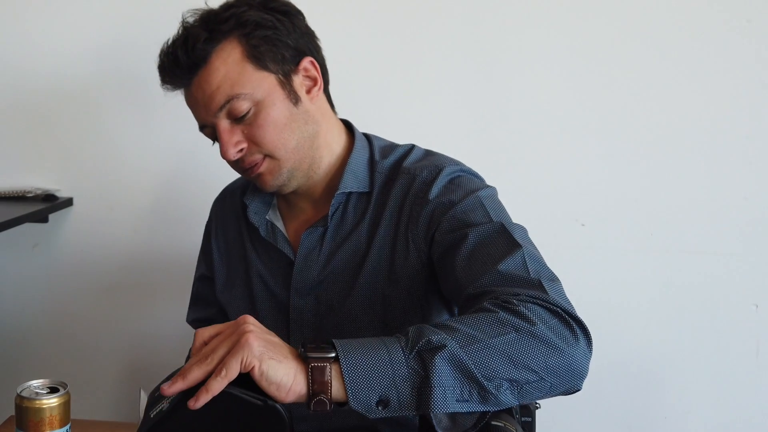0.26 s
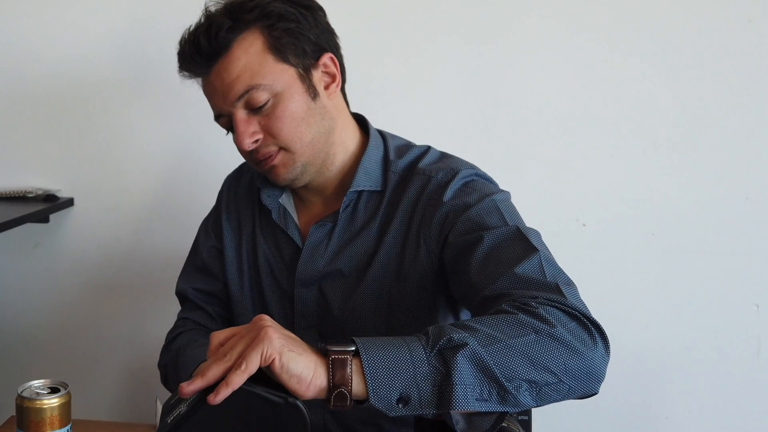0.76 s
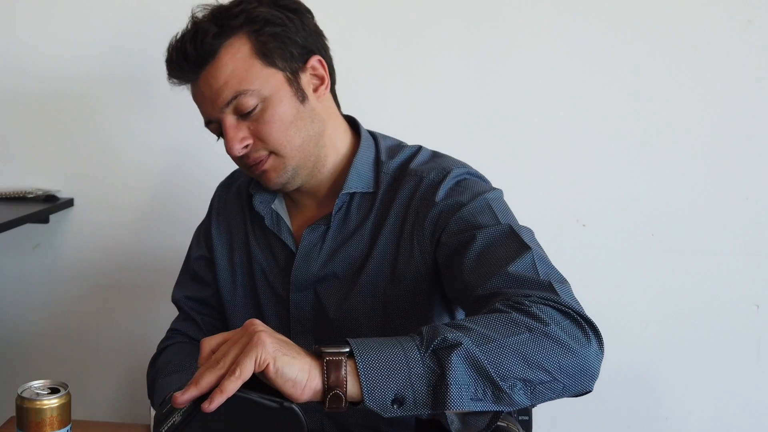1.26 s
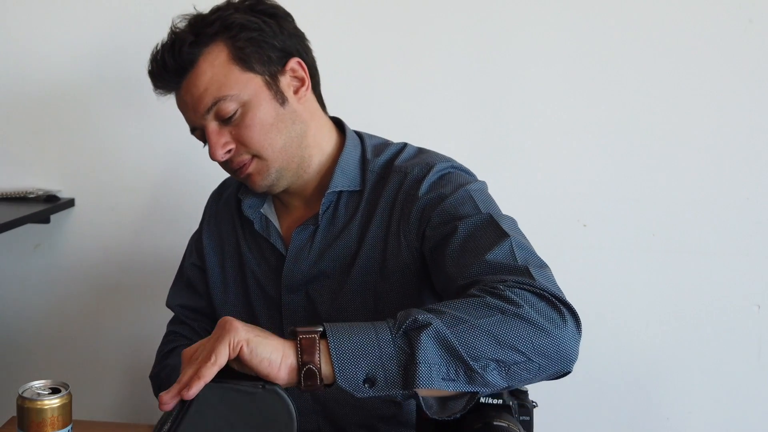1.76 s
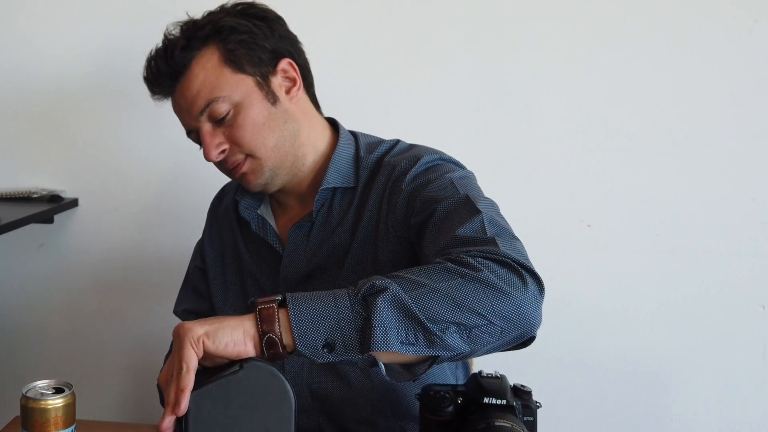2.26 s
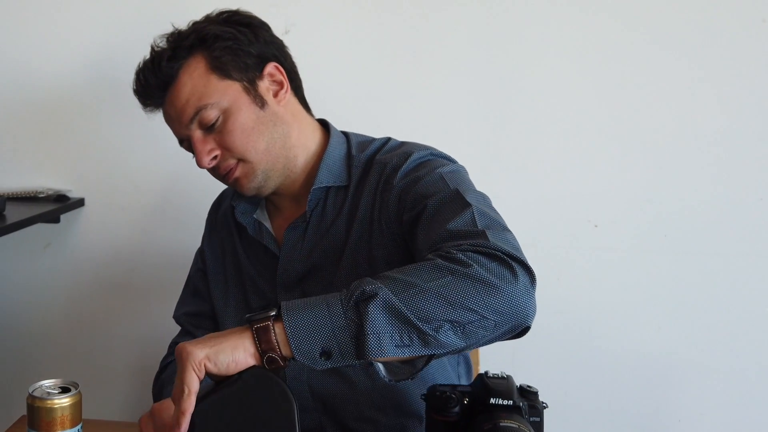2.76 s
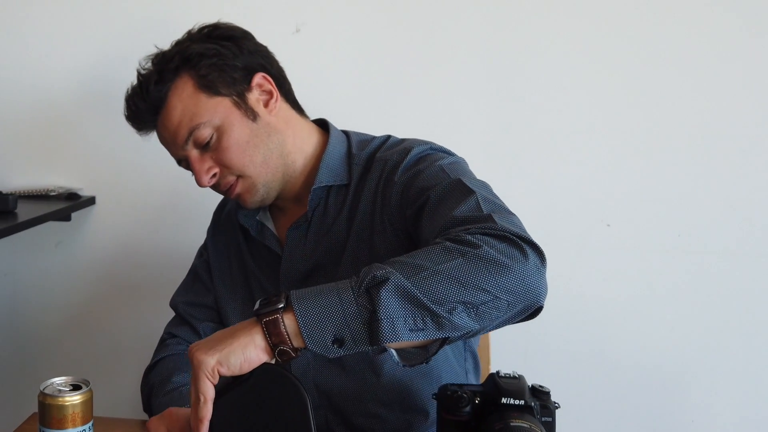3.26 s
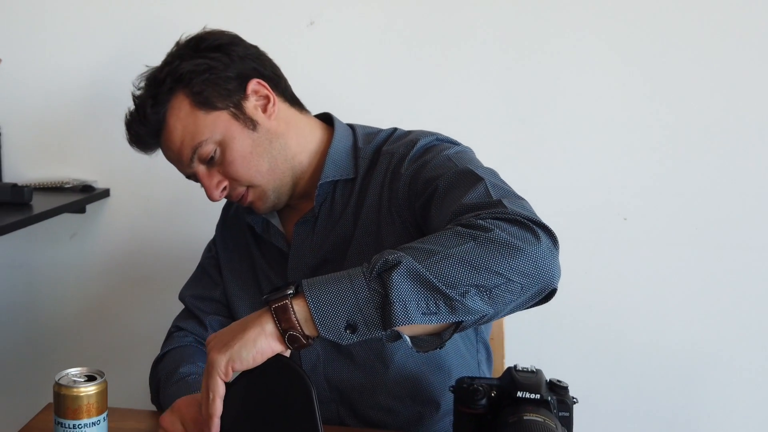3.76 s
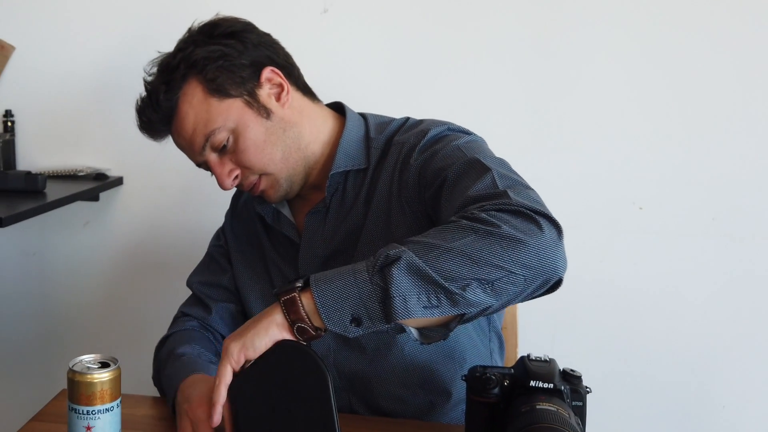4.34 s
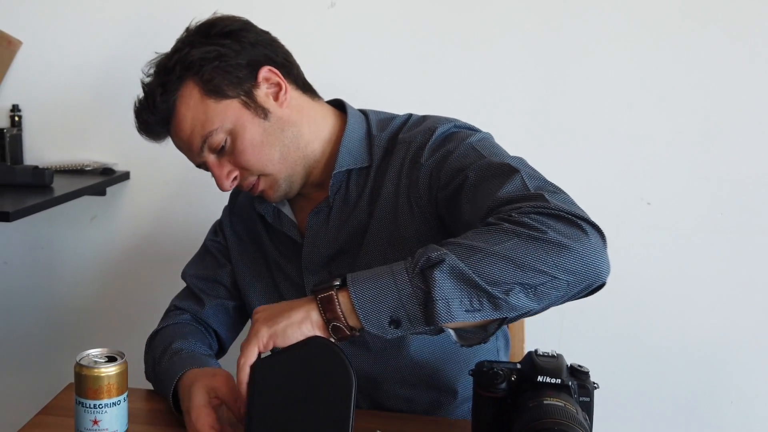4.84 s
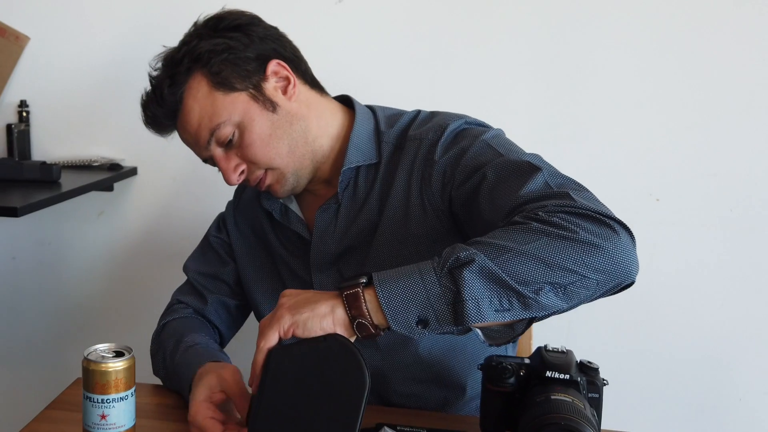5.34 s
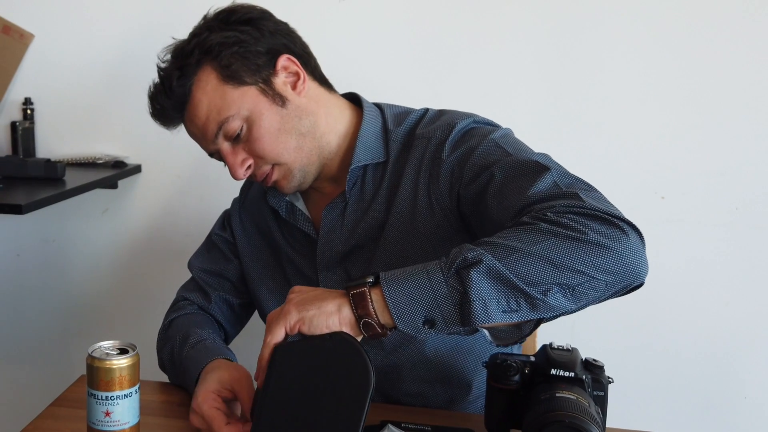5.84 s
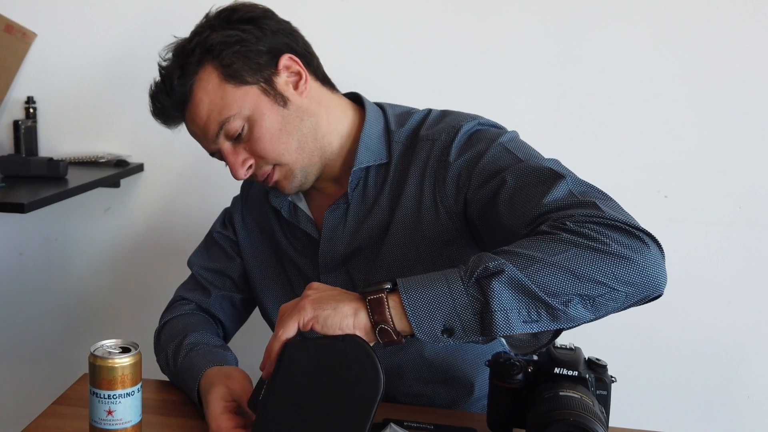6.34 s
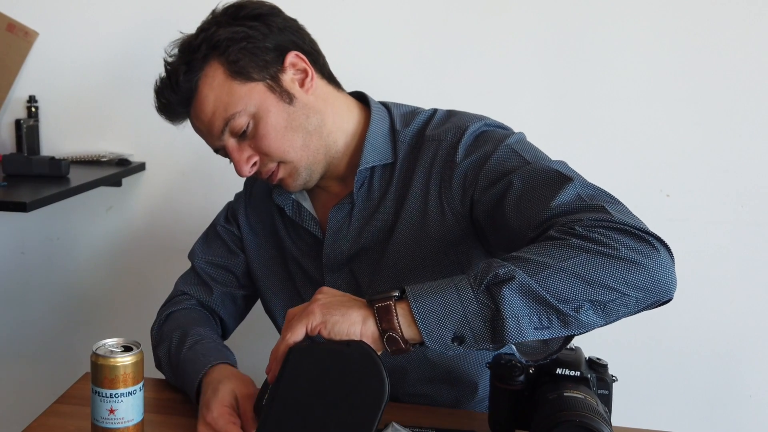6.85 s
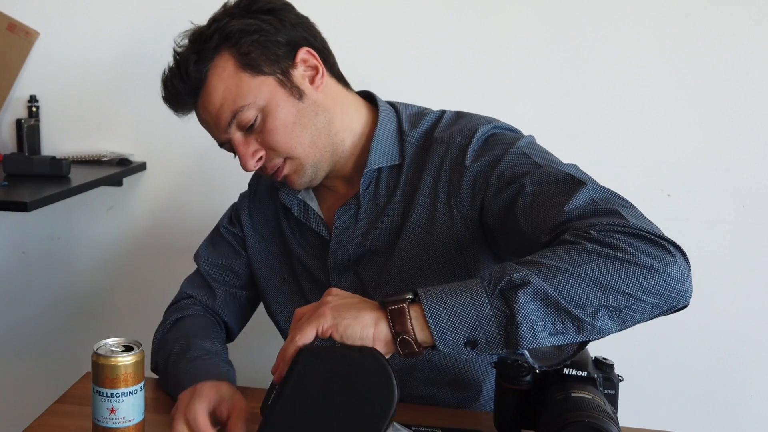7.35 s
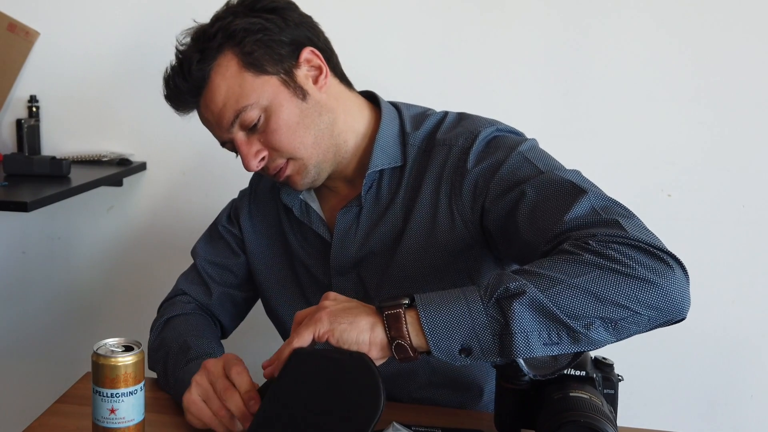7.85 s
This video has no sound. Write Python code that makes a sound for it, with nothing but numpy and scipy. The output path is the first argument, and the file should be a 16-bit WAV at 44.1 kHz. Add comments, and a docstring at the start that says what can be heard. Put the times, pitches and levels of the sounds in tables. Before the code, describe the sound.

Close indoor handling of a padded case on a wooden table: low scraping, a first cluster of knocks, then a louder rattling burst as it is tipped up. It falls nearly silent, with tiny hook ticks. A brief rasping crackle comes midway, scattered snaps follow, and finally a quick tearing of hook-and-loop and soft hollow thuds. Centred, close sound over a steady faint hush.

```python
"""In a small bare room a padded case is dragged, tipped up and knocked on a wooden table.
Fingers work its hook-and-loop strip: single hooks snap as short noise bursts, patches rip as dense slips.
Rubbing and knocks ring the modes of case and table; the table also rumbles and hums after jolts.
Direct sound sits in the middle; the echoes and the hush differ between left and right, mostly in the treble."""
import sys
import numpy as np
from scipy import signal
from scipy.fft import rfft, irfft, next_fast_len
from scipy.io import wavfile

SR = 44100
rng = np.random.default_rng(int(sys.argv[2]) if len(sys.argv) > 2 else 0)


def pcm_store(signal):
    """Save signal as 16-bit PCM."""
    levels = np.round(np.clip(np.atleast_2d(signal), -1, 1) * 32767)
    wavfile.write(sys.argv[1], SR, levels.astype(np.int16).T)


N = 357342

# Modes of case and table. Each row: pitch in Hz, level in dB, nominal ring time t60 in seconds.
CASE_MODES = [(144, -8, 0.024), (176.5, -3.5, 0.09), (225, 2, 0.09), (260, 1, 0.026), (388, -1.5, 0.1),
              (440, 5, 0.025), (515.7, -0.5, 0.039), (592.3, 1, 0.025), (693, -2.5, 0.075), (858, 0, 0.011),
              (955, 1.5, 0.033), (1053, 1.5, 0.014), (1233, -0.5, 0.017), (1464, 1.5, 0.035),
              (1656, 1.5, 0.017), (1898, 3, 0.04), (2150, -6.5, 0.023), (2606, -4.5, 0.028),
              (2950, -6.5, 0.029), (3350, -10, 0.025)]
LOW = [row for row in CASE_MODES if row[0] < 650]
HIGH = [row for row in CASE_MODES if row[0] >= 650]
# Modes of the stiff hook strip. Each row: pitch in Hz, level in dB, nominal ring time t60 in seconds.
STRIP_MODES = [(3930, -2, .02), (4730, -7.5, 0.0027), (5210, -5.5, .01), (6440, -4, 0.0066),
               (7110, 1.5, .01), (7850, -6.5, 0.006), (8650, -3.5, 0.027), (9700, -4.5, .008),
               (10700, -5, 0.0053)]
STRIP_FLAT = 0.94  # share of a tear that is heard between those modes
# Pushes of the case over the table. Each row: peak in seconds, rise in seconds, fall in seconds,
# hollow body in dB, scrape in dB, cloth in dB, loudest panel in Hz, loudest body mode in Hz.
PUSHES = [(0.029, 0.16, .2, -54, -56, -66, 928, 430), (0.16, 0.035, .2, -44.5, -51.5, -59.5, 1062, 450),
          (0.375, 0.025, .35, -42.5, -41, -89, 1045, 530), (0.53, 0.04, 0.091, -52, -36, -47.5, 1250, 540),
          (0.611, 0.11, 0.16, -39, -34.5, -45, 1513, 500),
          (0.679, 0.074, 0.071, -37.5, -41.5, -58, 1096, 380), (0.84, 0.1, 0.11, -53, -34, -48, 1624, 520),
          (0.9, 0.079, 0.06, -49.5, -35.5, -63, 990, 480), (1.1, .04, .15, -56.5, -42, -88, 979, 600),
          (1.279, 0.11, 0.12, -32.5, -30, -44.5, 980, 400),
          (1.569, 0.075, 0.052, -47.5, -61, -83, 891, 340), (1.792, .05, .12, -42, -46, -64, 760, 510),
          (1.919, 0.068, 0.26, -62.5, -43, -55.5, 1126, 450), (2.0, .08, 0.092, -58, -41.5, -53, 1000, 530),
          (2.079, .07, 0.32, -34.5, -30, -45, 1350, 396), (2.21, 0.12, 0.2, -31.5, -32.5, -45.5, 1193, 440),
          (2.36, 0.037, 0.19, -30.5, -31.5, -32.5, 1346, 400),
          (2.474, 0.014, 0.026, -45.5, -37.5, -43.5, 2603, 500),
          (2.53, 0.23, 0.16, -39.5, -36, -58.5, 888, 400), (3.11, .04, .1, -66.5, -64.5, -70, 908, 373),
          (3.165, .04, .06, -62.5, -73.5, -71, 900, 390),
          (3.28, .025, 0.069, -65.5, -66.5, -70.5, 894, 420), (3.528, .05, .1, -64, -74.5, -82.5, 722, 500),
          (5.1, 0.15, 0.089, -65, -72.5, -70.5, 962, 270),
          (5.332, 0.057, 0.18, -51.5, -68.5, -61, 1519, 225),
          (5.551, .12, 0.16, -73.5, -70.5, -72, 1092, 260),
          (5.937, 0.076, 0.11, -55, -60.5, -63.5, 1098, 380),
          (6.451, 0.16, 0.24, -62.5, -65.5, -74.5, 913, 330),
          (6.742, 0.028, 0.065, -52, -61.5, -80, 808, 350), (6.792, .04, .2, -42, -46.5, -62, 1083, 460),
          (6.89, 0.12, .09, -44, -56.5, -61, 876, 460), (7.04, 0.023, 0.083, -51, -71, -83, 801.5, 240),
          (7.08, .03, .14, -46.5, -61.5, -74, 746.5, 480), (7.21, .06, 0.053, -44.5, -52, -71, 1497, 385),
          (7.268, 0.063, 0.082, -39, -61, -53, 1012, 420),
          (7.37, 0.043, 0.076, -38, -36.5, -51, 804.5, 300),
          (7.44, .05, 0.088, -43.5, -45, -55.5, 784, 580), (7.55, .1, 0.17, -47.5, -59, -59.5, 783, 390),
          (7.72, .1, 0.099, -50, -73, -76.5, 791, 254.3), (7.985, 0.065, 0.14, -50, -52.5, -72, 1057, 476),
          (8.1, .1, 0.093, -47.5, -51, -65, 1113, 507)]
# Hands resting on the case and shifting a little.
# Each row: time in seconds, case in dB, cloth in dB, table in dB.
RESTING_HANDS = [(0, -52, -86, -65.5), (1, -63.5, -76, -70.5), (1.7, -63.5, -70, -70),
                 (2.75, -65, -76, -64.5), (3.3, -67, -81, -68.5), (3.85, -69, -75.5, -74),
                 (4.25, -80, -90, -75.5), (4.9, -73.5, -86, -73), (5.6, -69, -76.5, -72.5),
                 (5.8, -80, -100, -74.5), (6.25, -79.5, -80.5, -73), (7, -72.5, -73, -72.5),
                 (8.1, -68.5, -79, -78)]


def amp(db):
    """Decibels to gain."""
    return 10 ** (np.asarray(db) / 20)


def unit(x):
    """Scaled to rms 1."""
    return x / np.sqrt(np.mean(x ** 2) + 1e-20)


def along(points, hz):
    """Reads a curve of (Hz, value) points on a log frequency axis."""
    f, v = np.transpose(points)
    return np.interp(np.log(hz + 1), np.log(f + 1), v)


def curves(rows):
    """One value per sample for each column after the time."""
    s, *cols = np.transpose(rows)
    return [np.interp(np.arange(N) / SR, s, c) for c in cols]


def filtered(x, response):
    """x shaped by a complex response of frequency."""
    m = next_fast_len(N + SR // 2)
    return irfft(rfft(x, m) * response(np.fft.rfftfreq(m, 1 / SR)), m)[..., :N]


def coloured(x, spectrum):
    """x with the given spectrum, at rms 1."""
    return unit(filtered(x, lambda hz: amp(along(spectrum, hz))))


def band(centre_hz, width_hz, order):
    """A resonance applied order times, so that its skirts fall steeply."""
    return lambda f: (1j * f * width_hz / (centre_hz ** 2 - f * f + 1j * f * width_hz)) ** order


def modes(rows, spread):
    """Resonances, one per row; damping widens them by the factor spread."""
    def responses(f):
        return np.array([amp(db) * band(hz, spread * np.log(1000) / (np.pi * t60), order=2)(f)
                         for hz, db, t60 in rows])
    return responses


def freed(hz, centre_hz, octaves):
    """The grip of the hand damps the modes that lie far from centre_hz."""
    return np.exp(-(np.log2(hz / centre_hz) / octaves) ** 2)


def slips(rate, scatter_db, t60, smooth):
    """Stick-slip friction: short bursts of uneven size at random moments over a smooth rub."""
    chance, size = rng.random(N), rng.exponential(size=N)
    starts = (chance < rate / SR) * amp(scatter_db * np.minimum(size, 5))
    gate = signal.lfilter([1], [1, -amp(-60 / (t60 * SR))], starts)
    return (unit(gate) + smooth) * rng.standard_normal(N)


def swells(peak_s, rise_s, fall_s, db):
    """Power of each swell on a millisecond grid: 20 dB below its peak at rise_s before and fall_s after."""
    roundness = 1.314  # 1 = pointed swells, 2 = round ones
    late = np.arange(0, N / SR + .001, .001) - np.reshape(peak_s, (-1, 1))
    before, after = -late / np.reshape(rise_s, (-1, 1)), late / np.reshape(fall_s, (-1, 1))
    away = np.where(late < 0, before, after)
    return amp(2 * (np.reshape(db, (-1, 1)) - 20 * away ** roundness))


def fine(x):
    """From the millisecond grid to samples."""
    return np.interp(np.arange(N) / SR, np.arange(len(x)) / 1000, x)


def gain(power, rest_db):
    """Swells and resting level, added as powers and turned into a gain."""
    return np.sqrt(fine(power.sum(axis=0)) + amp(2 * rest_db))


def still_room():
    """The hush of the still room: steady coloured noise, drawn apart for sum and difference."""
    # Spectrum of the hush. Each row: frequency in Hz, relative level in dB per Hz.
    hush_spectrum = [(15, -19.5), (25, -21.5), (130, -8), (285, -3.5), (344, 2), (405, -18.5), (531, -15),
                     (775, -12), (5280, -17.5), (11600, -25), (16000, -34.5)]
    hush_db = -73.5
    return amp(hush_db) * coloured(rng.standard_normal((2, N)), hush_spectrum)


def room(x):
    """Diffuse echo tails for sum and difference, drawn anew twelve times a second as the sources move."""
    # Decay of the echoes. Each row: frequency in Hz, t60 in seconds.
    wall_decay = [(150, 0.44), (1000, 0.46), (4000, 0.14), (12000, 0.2)]
    hop = SR // 12
    wet = np.zeros((2, N + 2 * SR))
    for start in range(0, N, hop):
        hz, t, noise = signal.stft(rng.standard_normal((2, SR * 2 // 3)), SR, nperseg=256)
        gather = 1 - np.exp(-t / 0.00092)  # echoes need time to gather
        decay = amp(-60 * t / along(wall_decay, hz)[:, None]) * gather
        tail = signal.istft(noise * decay, SR, nperseg=256)[1]
        tail = tail / np.linalg.norm(tail[0])
        answer = signal.fftconvolve(x[None, start:start + hop], tail, axes=1)
        wet[:, start + 250:][:, :answer.shape[1]] += answer  # 250 samples after the direct sound
    return wet[:, :N]


def table():
    """Jolts make the frame rumble, ring the top, and leave a long hum in it."""
    # Jolts of the table. Each row: peak in seconds, frame rumble in dB, ring of the top in dB, fall in seconds.
    jolts = [(0.34, -70, -61, 0.086), (0.635, -52, -40.5, 0.14), (1.25, -43, -31, 0.073),
             (1.35, -70, -71, 0.29), (1.79, -73, -51.5, 0.19), (2.538, -70, -47.5, 0.11),
             (5.321, -59, -50.5, 0.081), (5.899, -62, -52.5, 0.15), (6.48, -73, -71, 0.17),
             (6.798, -68, -50.5, 0.12), (7.101, -73, -53.5, 0.12), (7.23, -50, -54, 0.21),
             (7.369, -49, -38.5, 0.16), (7.53, -61, -56, 0.77), (7.76, -69, -45.5, 0.055),
             (7.97, -70, -64, 0.14)]
    # Spectrum of the frame rumble. Each row: frequency in Hz, relative level in dB per Hz.
    frame_spectrum = [(15, -16.5), (25, -3.5), (45, -5), (70, -4.5), (100, -8), (160, -31), (300, -87)]
    jolt_rise_s = 0.011
    hum_hz, hum_t60_s, hum_db = 120.5, 1.3, -12.5  # hum level is over the jolt's ring
    rest_ring_db = -3  # over the table column of the resting hands
    s, rumble_db, ring_db, fall = np.transpose(jolts)
    rest_db = curves(RESTING_HANDS)[2]
    rumble = coloured(slips(rate=41, scatter_db=-2.5, t60=0.04, smooth=0.33), frame_spectrum)
    ring = unit(filtered(rng.standard_normal(N), modes(LOW[:1], spread=1.0))[0])
    late = np.maximum(np.arange(0, N / SR + .001, .001) - s[:, None], 0)
    hum_gain = amp(ring_db[:, None] + hum_db - 60 * late / hum_t60_s)
    hum = hum_gain * np.sin(2 * np.pi * hum_hz * late)
    rumble_gain = gain(swells(s, jolt_rise_s, fall, rumble_db), rest_db)
    ring_gain = gain(swells(s, jolt_rise_s, fall, ring_db), rest_db + rest_ring_db)
    return fine(hum.sum(axis=0)) + rumble_gain * rumble + ring_gain * ring


def stiff(x):
    """The strip's own modes colour whatever tears on it."""
    return filtered(x, lambda f: STRIP_FLAT + np.abs(modes(STRIP_MODES, spread=1)(f)).max(axis=0))


def fabric():
    """Threads and many small hooks let go one after another."""
    # Patches of hooks peeling. Each row: peak in seconds, rise in seconds, fall in seconds, level in dB.
    patches = [(0.16, 0.9, 0.14, -63), (0.62, 0.8, 0.66, -70), (1.78, 0.55, 0.21, -72),
               (1.762, 0.033, 0.037, -62), (2.29, 0.052, .1, -52), (3.11, 0.54, 0.2, -68),
               (3.28, .025, 0.047, -66.5), (4.67, 0.33, 0.19, -72.5), (5.329, 0.098, 0.14, -53.5),
               (5.56, 0.1, 0.12, -70), (6.0, 0.14, 0.28, -68.5), (6.84, 0.18, 0.25, -59),
               (7.205, 0.081, 0.12, -43), (7.26, .06, 0.13, -48.5), (7.449, 0.35, 0.32, -63.5),
               (8.08, 0.29, 0.38, -66)]
    # Spectrum of the cloth. Each row: frequency in Hz, relative level in dB per Hz.
    cloth_spectrum = [(1200, -34), (2000, 3.5), (2630, 2), (3300, -1.5), (4500, -13), (6500, -21),
                      (9000, -34.5), (13000, -55.5)]
    # Spectrum of the hooks. Each row: frequency in Hz, relative level in dB per Hz.
    hook_spectrum = [(2000, -59.5), (3700, -1), (5300, -1.5), (6800, -5), (8500, -13.5), (12000, -14.5),
                     (15000, -13.5), (16000, -30)]
    rip_cloth_db = -5.5  # coarse cloth within a rip, over the hooks
    rest_hooks_db = -7.5  # over the cloth column of the resting hands
    s, rise, fall, _, _, cloth_db = np.transpose(PUSHES)[:6]
    rips, rest_db = swells(*np.transpose(patches)), curves(RESTING_HANDS)[1]
    rubbing = np.vstack([swells(s, rise, fall, cloth_db), amp(2 * rip_cloth_db) * rips])
    threads = slips(rate=400, scatter_db=2, t60=.008, smooth=.9)
    cloth = unit(stiff(coloured(threads, cloth_spectrum)))
    small_hooks = slips(rate=700, scatter_db=2.0, t60=0.006, smooth=0.9)
    hooks = unit(stiff(coloured(small_hooks, hook_spectrum)))
    return gain(rubbing, rest_db) * cloth + gain(rips, rest_db + rest_hooks_db) * hooks


def snaps():
    """A few hooks tear together: a burst of milliseconds with a soft front, faintly heard through the case."""
    # Hooks snapping free. Each row: time in seconds, level in dB, pitch in Hz.
    hook_snaps = [(0.3158, -39, 3100), (1.273, -45, 6200), (1.495, -48, 4470), (1.6504, -45, 4040),
                  (2.0346, -31.5, 5954), (2.0505, -30, 5000), (2.104, -32, 5000), (2.198, -43, 5010),
                  (2.2735, -35.5, 5470), (2.2945, -12.5, 5000), (2.366, -33.5, 5230), (2.528, -46, 5520),
                  (2.7234, -45.5, 3400), (3.4156, -51, 5500), (3.92, -48, 4500), (4.392, -51, 5000),
                  (4.6545, -40, 5130), (4.7605, -51, 6720), (4.814, -45, 5830), (4.952, -45, 6200),
                  (5.0606, -48, 5550), (5.085, -41, 4950), (5.1044, -33, 5460), (5.219, -55.5, 4720),
                  (5.2279, -28.5, 4950), (5.245, -28, 5390), (5.2538, -33, 4500), (5.2789, -36, 4850),
                  (5.2895, -32, 5160), (5.295, -37.5, 5500), (5.3062, -31, 4900), (5.312, -36, 6000),
                  (5.3244, -45, 5800), (5.3338, -33.5, 7500), (5.3402, -18.5, 3950), (5.3564, -26, 3930),
                  (5.6695, -49, 4650), (5.8172, -48.5, 6000), (5.88, -46, 6530), (5.888, -44, 6730),
                  (5.9226, -34, 4950), (5.9626, -41, 5500), (5.9928, -39, 3750), (6.0423, -30.5, 4060),
                  (6.0965, -35, 5000), (6.1127, -39, 3650), (6.6593, -42, 5010), (6.681, -38.5, 7400),
                  (6.6925, -38, 4730), (6.7073, -37, 6200), (6.7411, -43, 8100), (6.7657, -27, 6460),
                  (6.8569, -34, 7200), (6.8618, -29, 8000), (6.8734, -31, 4020), (6.8794, -29.5, 5500),
                  (6.9441, -37, 5800), (6.9606, -39, 7040), (6.9698, -36.5, 6730), (7.0643, -40, 7300),
                  (7.0958, -43, 8600), (7.1021, -41, 8680), (7.1212, -41, 6700), (7.1276, -41, 7610),
                  (7.1445, -25, 6300), (7.1605, -26.5, 6360), (7.173, -35, 6410), (7.1843, -30, 6580),
                  (7.193, -29, 6730), (7.2029, -27, 5290), (7.2225, -17, 6424)]
    click_db = 5  # the first hook of a snap, over the snap's level
    fizz_db, fizz_db_per_octave = -12.5, 17  # fizz of a snap at 5 kHz; higher snaps fizz more
    in_case_db = -7  # how much of a snap reaches the panels
    tipped_s, screen_hz = 2.6, 10500  # until the case is tipped up it screens the strip: duller snaps
    bends_db = 2  # the strip bends, so its modes change strength from snap to snap
    width = 1.4  # ratio of the upper band edge to the pitch; the lower edge lies further off
    centre, top, case = np.zeros((2, N + SR)), np.zeros((2, N + SR)), np.zeros(N + SR)
    t = np.arange(SR // 30) / SR
    shape = amp(12.5 - 60 * t / 0.0087) * (1 - np.exp(-t / 0.0016)) ** 2
    ring = modes(STRIP_MODES, spread=2.2)(np.fft.rfftfreq(len(t), 1 / SR))
    mode_hz = np.transpose(STRIP_MODES)[0][:, None]
    for s, db, hz in hook_snaps:
        at = round(s * SR)
        tear = amp(db) * shape * rng.standard_normal(len(t))
        tear[round(.0015 * SR)] += amp(db + click_db)
        pitch_band = signal.butter(2, [hz / width ** 1.6, hz * width], "band", fs=SR)
        near_pitch = 0.3 + 1.5 * freed(mode_hz, hz, octaves=.26)  # modes near the pitch are strongest
        bend = amp(bends_db * rng.standard_normal((len(STRIP_MODES), 1)))
        strip = STRIP_FLAT + (bend * ring * near_pitch).sum(axis=0)
        tipped = int(s > tipped_s)
        centre[tipped, at:][:len(t)] += irfft(rfft(signal.lfilter(*pitch_band, tear)) * strip, len(t))
        top[tipped, at:][:len(t)] += amp(fizz_db + fizz_db_per_octave * np.log2(hz / 5000)) * tear
        case[at:][:len(t)] += amp(in_case_db) * tear
    screened, free = centre[:, :N] + filtered(top[:, :N], band(9600, 12000, order=2))
    dull = signal.lfilter(*signal.butter(3, screen_hz, fs=SR), screened)
    return free + dull + filtered(case[:N], modes(HIGH, spread=1.9)).sum(axis=0)


def pushed():
    """Gain and free pitch of body and panels: the strongest push weighs most in which modes are left free."""
    rest_panel_hz, rest_body_hz = 990, 313
    rest_scrape_db = -7  # over the case column of the resting hands
    s, rise, fall, body_db, scrape_db, _, panel_hz, body_hz = np.transpose(PUSHES)
    rest_db = curves(RESTING_HANDS)[0]
    body = (body_db, body_hz, rest_db, rest_body_hz)
    panels = (scrape_db, panel_hz, rest_db + rest_scrape_db, rest_panel_hz)
    out = []
    for db, hz, quiet_db, quiet_hz in [body, panels]:
        power = swells(s, rise, fall, db)
        level = gain(power, quiet_db)
        mean_hz = (fine(hz @ power) + quiet_hz * amp(2 * quiet_db)) / level ** 2
        out += [level, mean_hz]
    return out


def rubbed(rows, centre_hz, octaves, spread, source):
    """The rubbing sounds in the modes that the hand leaves free."""
    free = freed(np.transpose(rows)[0][:, None], centre_hz, octaves) + 0.2
    ringing = (free * filtered(source, modes(rows, spread))).sum(axis=0)
    return unit(ringing / np.linalg.norm(free, axis=0))


def drag():
    """Slips of the case's base ring its hollow body and its stiff panels."""
    body_gain, body_hz, scrape_gain, panel_hz = pushed()
    body_slips = slips(rate=260, scatter_db=1.5, t60=0.004, smooth=1.7)
    body = rubbed(LOW[1:], body_hz, octaves=1.0, spread=1.6, source=body_slips)
    panel_slips = slips(rate=250, scatter_db=0.0, t60=0.029, smooth=0.46)
    scrape = rubbed(HIGH, panel_hz, octaves=0.7, spread=1.0, source=panel_slips)
    return body_gain * body + scrape_gain * scrape


def knocks():
    """Each knock clicks, cracks briefly and rings the modes the hand leaves free, at new strengths and phases."""
    # Knocks of the case. Each row: time in seconds, high modes in dB, low modes in dB,
    # crack in dB (before a fixed lift), loudest panel in Hz, loudest body mode in Hz.
    blows = [(0.143, -42, -42.5, -43.5, 1090, 370), (0.359, -31, -37, -55, 890, 600),
             (0.378, -43, -39, -50, 1100, 510), (0.413, -32.5, -33, -68, 1070, 520),
             (0.631, -56, -29, -63, 1500, 490), (0.664, -50, -30, -55, 1110, 212),
             (1.077, -29, -39, -47, 786, 405), (1.092, -30.5, -50, -57, 904, 605),
             (1.2177, -22.5, -26, -36, 3050, 590), (1.239, -18, -20, -32.5, 1060, 400),
             (1.262, -21, -17.5, -47, 840, 265), (1.762, -36, -27, -41, 694, 510),
             (1.902, -39, -58, -54, 1070, 397), (1.977, -29.5, -66, -58, 1020, 440),
             (1.994, -32, -64, -58, 980, 580), (2.0335, -30, -21.5, -28, 1500, 584),
             (2.0513, -14.5, -20.5, -14.5, 1240, 382), (2.078, -28, -22, -36, 1090, 375),
             (2.1044, -15.5, -20.5, -19, 1060, 383), (2.143, -27, -22, -29, 1480, 385),
             (2.164, -21.5, -25, -42, 1430, 385), (2.211, -22, -18, -24.5, 1070, 392),
             (2.227, -24, -31, -33, 1070, 470), (2.296, -22, -23, -22.5, 1000, 364),
             (2.333, -8.5, -20, -7.5, 2460, 390), (2.368, -15, -43, -20, 1350, 360),
             (2.397, -25, -26, -36, 960, 380), (2.424, -26, -27.5, -34, 1250, 448),
             (2.449, -21.5, -37, -36, 905, 593), (2.472, -12, -23.5, -36, 2550, 610),
             (2.495, -25, -25, -38, 920, 380), (2.526, -29, -21.5, -41.5, 708, 335),
             (2.805, -49, -49, -49.5, 780, 370), (2.906, -65, -48, -60.5, 700, 380),
             (2.983, -53, -58.5, -53.5, 700, 380), (3.089, -53.5, -53, -61, 940, 600),
             (5.094, -50, -50.5, -48, 935.5, 264.6), (5.315, -45, -38.5, -53, 2220, 220),
             (4.654, -55.5, -67.5, -63, 900, 351), (4.952, -61, -63, -57.5, 1320, 301.4),
             (5.67, -58, -63.5, -56, 870, 221), (5.871, -67, -42.5, -67.5, 704, 180),
             (5.9221, -35.5, -34.5, -49, 1270, 428), (5.944, -48.5, -43, -61, 1300, 401),
             (6.715, -48, -48, -67, 750, 239), (6.766, -39.5, -43, -44, 765, 430),
             (7.063, -43, -42, -61, 740, 470), (7.224, -34, -35, -32, 1480, 446),
             (7.301, -39, -29.5, -36, 700, 575), (7.354, -39, -27, -47, 700, 580),
             (7.3635, -32, -13.5, -55, 700, 286), (7.38, -37, -22.5, -53, 696, 467),
             (7.386, -40, -25.5, -60, 700, 510), (7.423, -40, -20, -54, 700, 620),
             (7.46, -47, -25, -60, 700, 554), (7.525, -35, -34, -47, 700, 465),
             (7.748, -72, -31.5, -65, 690, 226)]
    click_db = 4.5  # the first contact, over the crack column
    held = 0.93  # share of the free ring time left to a case held in the hand
    panel_octaves, body_octaves = .26, .36  # how narrowly a knock picks its modes
    out, cracks, clicks = np.zeros(N + SR), np.zeros(N + SR), np.zeros(N)
    t = np.arange(SR // 3) / SR
    hz, db, t60 = np.transpose(CASE_MODES[1:])[:, :, None]
    low = hz <= LOW[-1][0]
    rise = 1 - np.exp(-t * hz / 0.45)  # padding spreads a blow over about a cycle
    for s, high_db, low_db, crack_db, panel_hz, body_hz in blows:
        at = round(s * SR)
        body = amp(low_db) * (freed(hz, body_hz, body_octaves) + 0.34)
        above = 0.31 * np.minimum(panel_hz / hz, 1) ** 1.6  # damped modes, weaker above the loudest panel
        panels = amp(high_db) * (freed(hz, panel_hz, panel_octaves) + above)
        strength = np.where(low, body, panels)
        chance_db, phase = 2.6 * rng.standard_normal(hz.shape), rng.uniform(-1.1, 0.69, hz.shape)
        decay = amp(db + chance_db - 1.5 - 60 * t / (held * t60))
        ring = strength * decay * rise * np.sin(2 * np.pi * hz * t + phase)
        out[at:][:len(t)] -= ring.sum(axis=0)
        cracks[at:][:len(t)] += amp(crack_db + 6.0 - 60 * t / 0.034) * rng.standard_normal(len(t))
        clicks[at] = -amp(crack_db + click_db)
    return (filtered(out[:N], band(830, 4300, order=2))
            + filtered(cracks[:N], band(2400, 3800, order=4))
            + filtered(clicks, band(2600, 6000, order=4)))


def scene():
    """Direct sound in the middle; room and hush spread in the treble."""
    # Left-right difference of the diffuse sound. Each row: frequency in Hz, level in dB.
    spread_curve = [(20, -73.5), (1800, -84), (2600, -27.5), (4400, 0.5), (9000, -9), (15000, -3)]
    # the case is too small to radiate much below 168 Hz
    small = signal.butter(4, 168, "high", fs=SR, output="sos")
    near = signal.sosfilt(small, drag() + knocks()) + table() + fabric() + snaps()
    mid, other = amp(-9.5) * room(near) + still_room()
    side = filtered(other, lambda hz: amp(along(spread_curve, hz)))
    return near + mid + np.array([side, -side])


def record(dry):
    """The treble falls steeply around 15.7 kHz and nothing is kept from the band limit up."""
    top_hz = 16350
    return filtered(dry, lambda hz: (hz < top_hz) / (1 + (hz / 15700) ** 50))


dry = scene()
out = record(dry)
pcm_store(out)
```